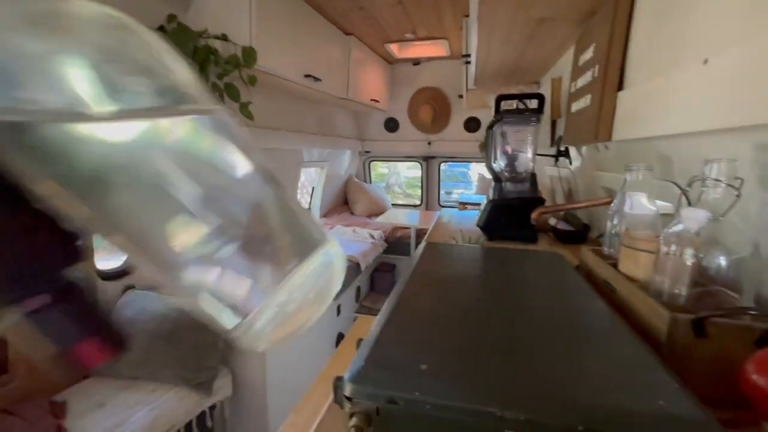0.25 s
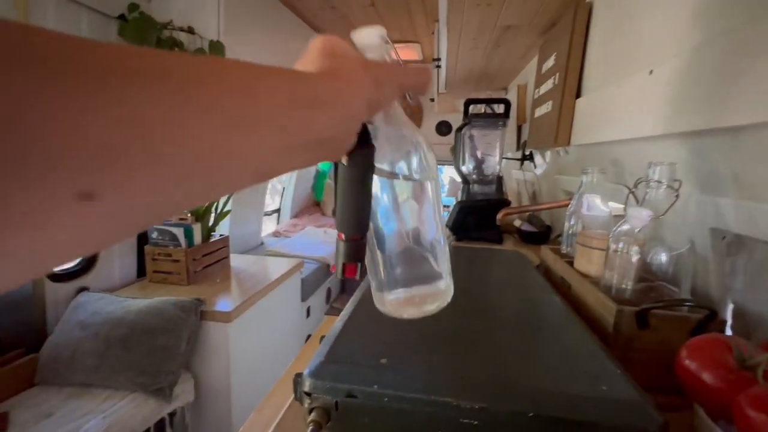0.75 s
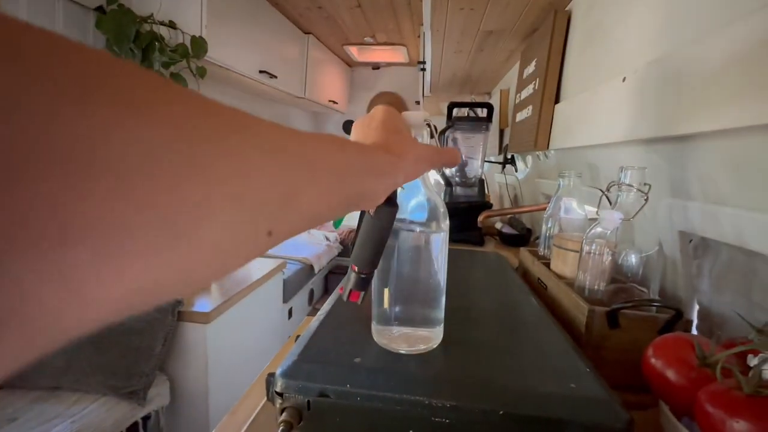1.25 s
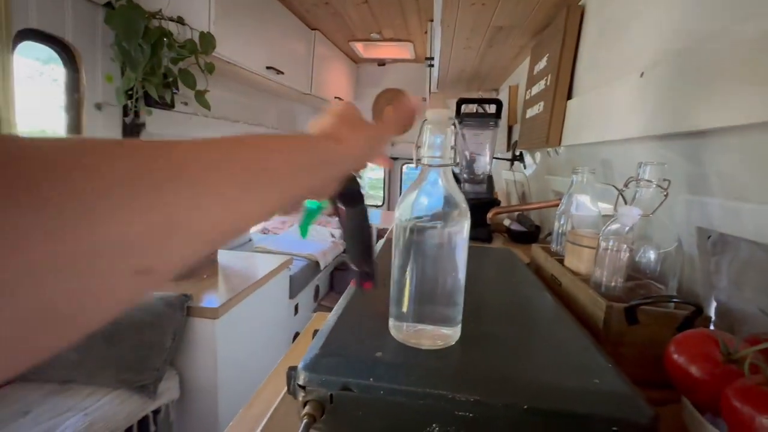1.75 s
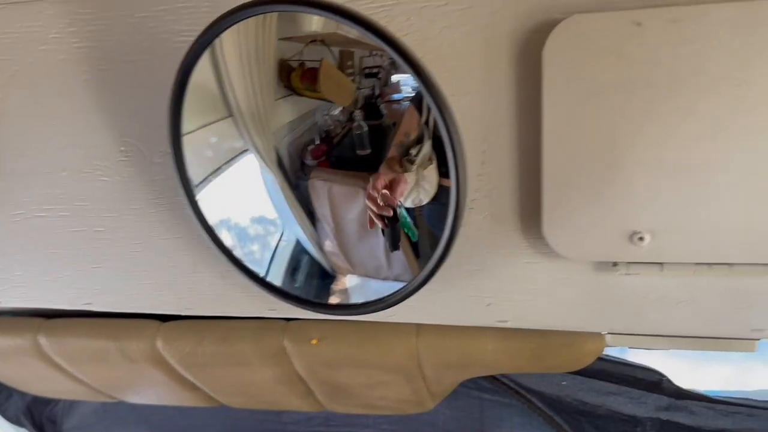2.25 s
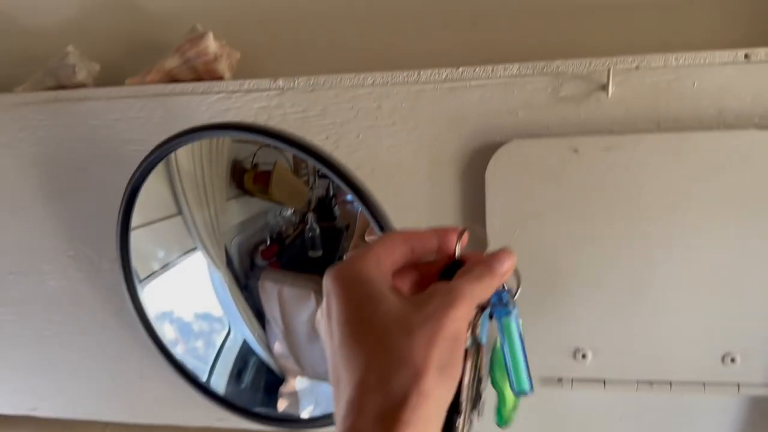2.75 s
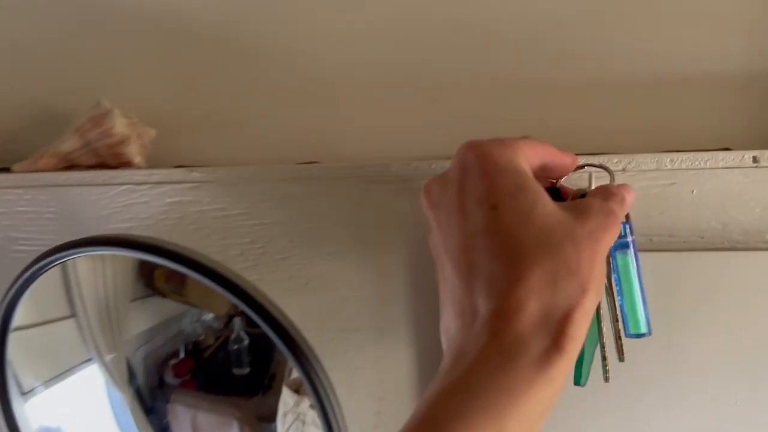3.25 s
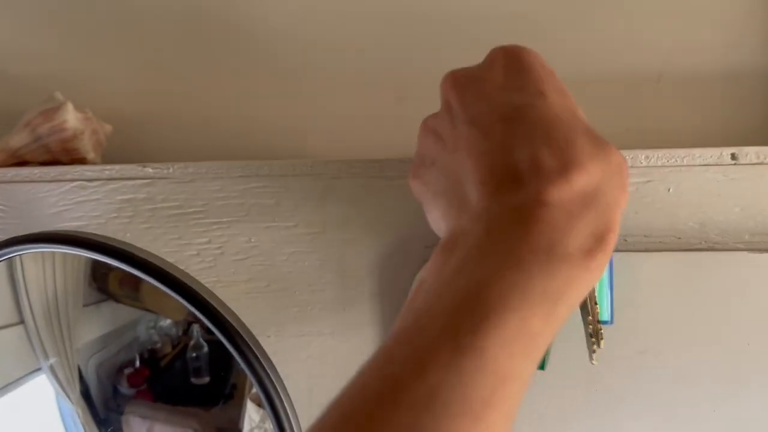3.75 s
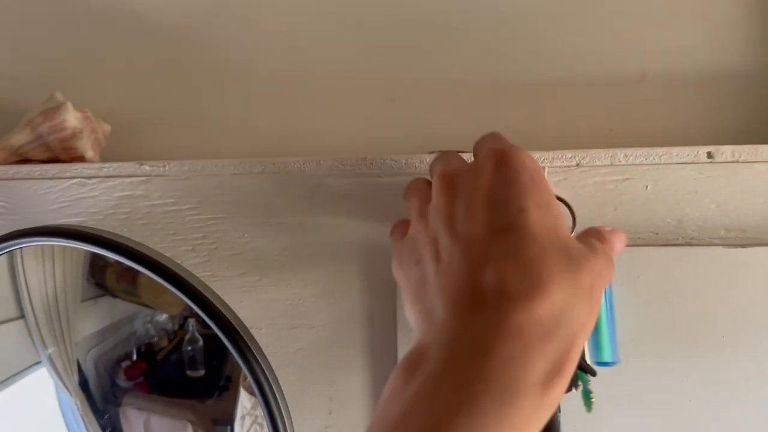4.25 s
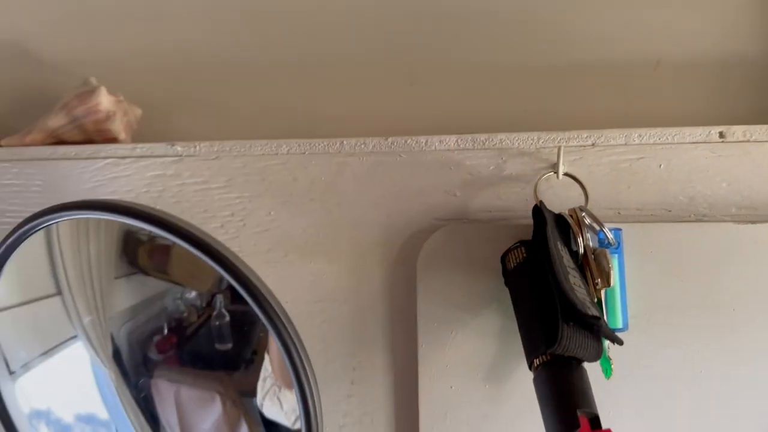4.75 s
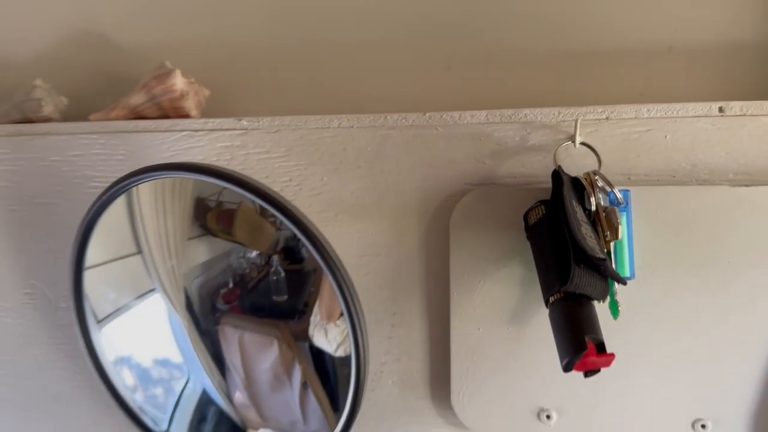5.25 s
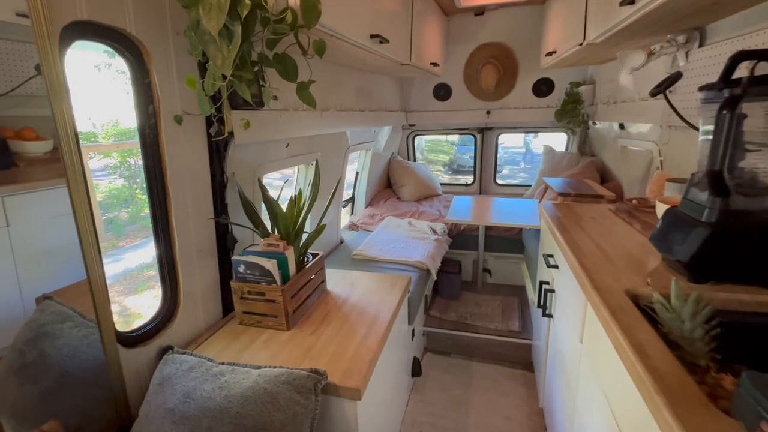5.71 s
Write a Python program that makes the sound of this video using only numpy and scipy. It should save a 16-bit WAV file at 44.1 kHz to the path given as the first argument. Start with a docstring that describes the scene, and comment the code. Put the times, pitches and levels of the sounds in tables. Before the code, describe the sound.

Cloth rustles as an arm reaches out, then a bottle base bumps a counter twice and rocks once, with a short woody ring. An appliance hums nearby until a cut to a quieter corner. There, bright keys jingle in a hand, grate on a hook, bump the wooden panel and clatter into place. Dry, close cabin sound with little reverberation, picked up in stereo near the hands.

```python
"""Inside a small camper van with a low hum, clothing rustles and a glass bottle is set down on a counter.
Then, in a quieter corner, a bunch of keys jingles in a hand, clacks and scrapes on a wall hook, and drops
onto it. Struck objects are noise bursts plus damped modes, with a short cabin tail behind glass and metal;
the wooden panel is modes alone. Cloth, sliding, scraping, whir, rumble and air are shaped noise, the hum
is two unsteady sines, and one faint click comes near the end."""
import sys
import numpy as np
from scipy import signal
from scipy.fft import rfft, irfft, next_fast_len
from scipy.io import wavfile
from scipy.ndimage import uniform_filter1d, map_coordinates

SR = 44100
rng = np.random.default_rng(int(sys.argv[2]) if len(sys.argv) > 2 else 0)


def output_pcm(signal):
    """Save a mono or channel-first signal as 16-bit PCM at the path in sys.argv[1].

    Samples are clipped to [-1, 1] before scaling.
    """
    pcm = np.clip(np.atleast_2d(signal).T, -1, 1) * 32767
    wavfile.write(sys.argv[1], SR, np.round(pcm).astype(np.int16))


N = 263718
TIME = np.arange(N) / SR  # seconds through the scene
AGE = np.arange(SR // 3) / SR  # seconds since a blow

# All dB in the tables are relative levels, before the fixed gains inside the functions.
# Keys touching each other. Each row: start in seconds, strength in dB, brightness in dB,
# the struck key's pitch in Hz, its t60 in seconds.
JINGLES = [(0.249, -44, -13, 8650, 0.019), (1.945, -58.5, 2.5, 13100, .03), (2.0637, -44, -10, 7300, .04),
           (2.147, -45, 3, 8160, 0.12), (2.3045, -39.5, -0.5, 14500, .05), (2.425, -62.5, -16, 4620, .04),
           (2.456, -70, -20, 4440, 0.024), (2.5791, -42.5, 0.5, 15680, 0.089),
           (2.796, -39.5, -4.5, 15500, 0.32), (2.871, -51, 5, 8070, 0.029),
           (2.9296, -55.5, -7.5, 10000, .025), (3.315, -51.5, -1, 14300, .06),
           (3.4083, -52, -4, 8100, 0.075), (3.6591, -62.5, -7, 15100, 0.043),
           (3.81, -61.5, -19, 5650, 0.023), (3.8694, -45.5, -9, 10700, .03),
           (3.9165, -35, -2.5, 10450, .06), (3.923, -31, 5.5, 13360, 0.066),
           (3.933, -39, 1.5, 15400, 0.097), (4.1222, -41, -7, 10400, .04), (4.156, -45.5, -9, 12900, .04),
           (4.186, -45.5, -13, 15400, .035)]
# Modes of the whole bunch. Each row: nominal pitch in Hz, level in dB.
KEY_MODES = [(5152, -11), (6150, -11), (7250, -7), (7950, -3), (8170, -5), (10280, -2), (10600, -6),
             (12950, -1), (13350, -4), (14250, -5), (15170, -6), (15680, -4)]
# Spectrum of a jingle. Each row: frequency in Hz, gain in dB.
JINGLE_COLOUR = [(200, -22), (1200, -7.5), (4000, -3), (8000, 0), (14000, 3.5), (16000, 5.5)]
JINGLE_T60_S, BUNCH_T60_S = 0.035, 0.082  # chatter of one touch; ring of the whole bunch
KEY_SPLIT_HZ = 180  # a key's close pair of modes
# Faint ticks while the bunch swings.
SWING_START_S, SWING_END_S, TICKS_PER_S = 2.15, 3.7, 5.5
TICK_DB, TICK_SPREAD_DB, TICK_BRIGHT_DB = -59.5, 3, -4.5

# Ring and fobs striking the hook. Each row: start in seconds, strength in dB, wall clack in dB, clink in dB,
# hook's ring in dB, chatter t60 in seconds, panel bump in dB, two pitches of the struck piece in Hz.
CLACKS = [(3.2689, -26, -6, -6, -12, 0.057, -30.5, 3580, 9150),
          (3.4736, -34.5, -6.5, -6.5, -20, 0.038, -36.5, 920, 8320),
          (3.878, -37.5, -1.5, 6, -18, 0.068, -33.5, 1060, 7070),
          (3.917, -42, -4, 1, -17.5, .085, -44, 1100, 14000),
          (4.0273, -25.5, -0.5, -18.5, -14, .042, -33, 1630, 850),
          (4.032, -18.5, -7.5, -8.5, -6, .06, -36, 4660, 3214),
          (4.1962, -27, -26, -4, -6, 0.053, -35, 423, 7200),
          (4.239, -24, -7.5, -9, -9.5, 0.077, -50, 4800, 5600),
          (4.256, -33.5, 0.5, -11, -11, 0.048, -55, 4200, 6600)]
# Modes of ring, hook and board. Each row: pitch in Hz, level in dB, t60 in seconds.
HOOK_MODES = [(596, -6.5, .1), (847, -6, .09), (1118, -8, .11), (1624, -15.5, 0.027), (2060, 3, .085),
              (2260, -2, .08), (2670, -6, .12), (3020, -4.5, .1), (3200, -5, 0.043), (3600, -8, .11),
              (4240, -7.5, .12), (4780, 0, .09), (5200, -5, .085), (6540, -9, .075)]
# Spectrum of a clack. Each row: frequency in Hz, gain in dB.
CLACK_COLOUR = [(100, -22), (200, 2.5), (380, 10), (620, 9), (1200, 11), (1800, 3), (2900, 0), (3700, -1),
                (4800, 0), (6000, 1.5), (8500, 7.5), (14000, 0.5)]
# Resonances of the key ring, heard in every clack and scrape: a plain list of pitches in Hz.
RING_HZ = [2350, 2940]
KNOCK_DB, SHIMMER_DB = -1.5, -2  # low knock; top treble relative to the clink

# The ring scraping along the hook. Each row: start in seconds, level in dB.
SCRAPES = [(3.229, -50), (3.421, -50), (3.613, -62), (3.733, -59), (4.138, -48)]
# Spectrum of the grating. Each row: frequency in Hz, level in dB per Hz.
GRATE_SPECTRUM = [(150, -22.5), (380, 0.5), (1100, 3.5), (1700, -12.5), (2700, -3), (4000, -21),
                  (8500, -23), (14000, -25)]
SCRAPE_ATTACK_S, SCRAPE_HOLD_S, SCRAPE_T60_S = 0.0037, 0.0061, 0.044

# Glass base on the counter. Each row: start in seconds, strength in dB, thud in dB, treble in dB,
# rocking t60 in seconds.
BOTTLE = [(1.045, -23, -8, -15, 0.074), (1.2063, -20.5, -12, -12, 0.07), (1.3518, -33, -7.5, -19.5, 0.18)]
# Modes of bottle and counter top. Each row: pitch in Hz, level in dB, t60 in seconds.
COUNTER_MODES = [(250, -3, .12), (317, 0, .36), (382, -9, .16), (474, -2, .19), (514, -3, .21),
                 (565, -7, .12), (791, 1.5, .17), (1040, -5, .16), (1322, -2, .14), (1771, -10, .13),
                 (2080, -5, .1), (2240, -10, .11), (2490, -7, .07), (2982, -7, .08)]
# Spectrum of the bottle's blow. Each row: frequency in Hz, gain in dB.
BOTTLE_COLOUR = [(100, -16), (180, 5), (270, 16), (520, 6.5), (1100, 1.5), (2600, -4.5), (5000, 2.5),
                 (9500, -2.5), (14500, -11)]

# Hand and pouch bumping the wall panel. Each row: start in seconds, strength in dB.
BUMPS = [(3.293, -35), (3.335, -40.5), (3.359, -38.5), (3.529, -38), (3.659, -44.5), (3.738, -45),
         (3.934, -36), (3.973, -41)]
# Modes of the wooden panel. Each row: nominal pitch in Hz, level in dB, t60 in seconds.
PANEL_MODES = [(93.6, -15, 0.21), (262, -2.5, 0.065), (289.5, -1.5, 0.13), (365.4, -5, 0.15),
               (458, -13.5, 0.027), (575, -11.5, 0.077), (830, -7.5, 0.048), (987, -10.5, 0.08)]
# The whole wall flexing. Each row: pitch in Hz, level in dB, t60 in seconds.
WALL_MODES = [(65, -5, 0.27), (100.6, -4, 0.35)]
WALL_DB = -7.5  # flexing wall relative to the panel
PANEL_DETUNE = .06  # share by which the pitch shifts with where the hand presses
BUMP_LAG_S = 0.00626  # the panel answers a clack this late

# Clothing moving with the arm. Each row: start in seconds, hold in seconds, level in dB.
REACHES = [(-.03, 0.078, -51.5), (.25, 0.0067, -52.5), (.583, 0.14, -50.5), (.792, 0.15, -50.5)]
# Spectrum of the clothing. Each row: frequency in Hz, level in dB per Hz.
CLOTH_SPECTRUM = [(120, -31), (200, 1.5), (380, -6.5), (448, -2), (836, -7), (1160, -3.5), (1840, -11.5),
                  (4120, -17.5), (5940, -19), (10300, -22.5), (11500, -34.5), (13300, -37), (16000, -35)]
# Cloth resonances: a plain list of pitches in Hz.
RUSTLE_HZ = [5170, 5860]
# Fingers and pouch sliding on the wall. Each row: start in seconds, hold in seconds, level in dB.
SLIDES = [(2.06, 0.37, -68.5), (2.97, 0.76, -67.5), (3.19, 0.1, -64.5), (3.86, 0.067, -57),
          (4.13, 0.13, -55.5)]
# Spectrum of the sliding. Each row: frequency in Hz, level in dB per Hz.
SLIDE_SPECTRUM = [(110, -38.5), (180, -0.5), (432, -2.5), (527, -4), (2440, -15), (2820, -14.5),
                  (7140, -25), (9210, -26.5), (10300, -68.5), (14000, -37)]
# The hand brushing over the cloth pouch. Each row: start in seconds, hold in seconds, level in dB.
BRUSHES = [(3.05, .17, -65.5), (4.29, 0.049, -55.5)]
# Spectrum of the brushing. Each row: frequency in Hz, level in dB per Hz.
BRUSH_SPECTRUM = [(200, -23), (450, 3), (900, 0), (1500, -2), (2500, -6), (3000, -17), (7000, -48),
                  (14000, -48)]
# One faint dry click. A single row: start in seconds, peak in dB.
CLICK = (5.5795, -42.5)

# The background at each listening spot. Each row: start in seconds, rumble in dB, air in dB, hum in dB,
# whir in dB.
SPOTS = [(0, -50, -88, -47, -55.5), (2.082, -56, -65.5, -62.5, -81), (5.58, -54.5, -70.5, -70, -67)]
# Partials of the hum. Each row: pitch in Hz, level in dB.
HUM = [(133.5, -4.5), (313, -20)]
# Spectrum of the whir by the counter. Each row: frequency in Hz, level in dB per Hz.
WHIR_SPECTRUM = [(100, -28), (170, -8.5), (290, 0), (400, -8), (520, -4.5), (800, -5.5), (1300, -5),
                 (1750, -19), (3000, -23), (6000, -27.5), (10000, -32.5), (15000, -62)]
# Spectrum of the low rumble. Each row: frequency in Hz, level in dB per Hz.
RUMBLE_SPECTRUM = [(15, -32.5), (28, -12.5), (38, -6), (50, -1), (65, -0.5), (85, -4.5), (110, -7.5),
                   (150, -7.5), (190, -18.5), (260, -41), (400, -58.5)]
# Spectrum of the air noise. Each row: frequency in Hz, level in dB per Hz.
AIR_SPECTRUM = [(100, -17), (170, -6.5), (440, -19), (889, -17.5), (959, -18.5), (1600, -27), (2090, -34),
                (2300, -28.5), (4920, -34), (8220, -40), (11600, -70), (14300, -37), (16000, -76)]

# Decay of the cabin. Each row: frequency in Hz, t60 in seconds.
CABIN_T60 = [(200, 0.68), (600, 0.26), (2000, 0.18), (8000, 0.16), (15000, 0.086)]
# Stereo image. Each row: frequency in Hz, left-right likeness (1 is identical).
ALIKE = [(30, 1), (100, 0.81), (330, 0.81), (600, 0.13), (1100, 0.047), (5000, 0.15), (14000, 0.27)]
# Colour of the microphone. Each row: frequency in Hz, gain in dB.
MICROPHONE = [(10000, 1.5), (10900, 8), (11500, -5), (12100, 4.5), (12800, -2), (15700, -2.5),
              (16500, -23.5)]
# Colour of the part common to both ports. Each row: frequency in Hz, gain in dB.
CANCEL = [(9800, -0.5), (10600, -13), (11300, -23), (12000, -12.5), (12900, 4)]
TOP_HZ = 16700  # upper band limit


def jingles():
    """The clear touches, and faint chance ticks while the bunch swings in the hand."""
    out = np.zeros((2, N))
    for s, *blow in JINGLES:
        add(out, s, touch(*blow))
    for slot_s in np.arange(SWING_START_S, SWING_END_S, 1 / TICKS_PER_S):
        late, size, choice = rng.random(3)
        key_hz = KEY_MODES[int(choice * len(KEY_MODES))][0]
        tick_db = TICK_DB + TICK_SPREAD_DB * (2 * size - 1)
        add(out, slot_s + late / TICKS_PER_S, touch(tick_db, TICK_BRIGHT_DB, key_hz, JINGLE_T60_S))
    return out * amp([[.2], [-.2]])  # dB: a touch to the left


def touch(db, bright_db, key_hz, key_t60):
    """Two keys tick together; the struck one rings along with the rest of the bunch."""
    pair = [(key_hz, 0, key_t60), (key_hz - KEY_SPLIT_HZ, -2, key_t60 / 2)]
    metal = amp(1) * bunch(BUNCH_T60_S) + amp(-3.5) * ring(pair, scatter_db=0)
    chatter = rattle(JINGLE_T60_S, rise=0.000532, spiky_db=4)
    tick = chatter + metal + amp(-4) * cabin()
    tint = [(4000, -bright_db), (8000, 1.5), (14000, bright_db)]
    return amp(db + 15) * coloured(tick, tinted(JINGLE_COLOUR, tint))


def bunch(t60):
    """The keys damp each other, and each grip detunes them a little."""
    modes = [(hz * (1 + 0.02 * rng.standard_normal()), db, t60) for hz, db in KEY_MODES]
    return ring(modes, scatter_db=7)


def clacks():
    """Key ring and fobs hit the hook: a resonant burst plus the ringing of hook and keys."""
    out = np.zeros((2, N))
    for s, db, clack_db, clink_db, hook_db, t60, _, *piece_hz in CLACKS:
        burst = rattle(t60, rise=0.0037, spiky_db=4) + amp(-12) * cabin()
        blow = resonant(burst, RING_HZ + piece_hz, width_hz=160, boost_db=10)
        metal = amp(hook_db) * ring(HOOK_MODES, scatter_db=2) + amp(-10) * bunch(t60=.08)
        tint = [(400, KNOCK_DB), (1200, clack_db), (1800, clack_db), (2300, 0), (4800, 0),
                (8000, clink_db), (14000, clink_db + SHIMMER_DB)]
        add(out, s, amp(db + 18.5) * coloured(blow + metal, tinted(CLACK_COLOUR, tint)))
    return out * amp([[.5], [-.5]])  # dB: a little to the left


def scrapes():
    """Feeling for the hook, the ring grates over it in short runs of tiny slips."""
    slips = rush(GRATE_SPECTRUM) * amp(3.4 * wobble(600))
    grate = unit(resonant(slips, RING_HZ, width_hz=230, boost_db=4.5))
    rows = [(s, SCRAPE_HOLD_S, db) for s, db in SCRAPES]
    return strokes(rows, SCRAPE_ATTACK_S, SCRAPE_T60_S) * grate


def bottle():
    """The glass base lands on one edge, then flat, and rocks once; the counter rings."""
    out = np.zeros((2, N))
    for s, db, thud_db, treble_db, t60 in BOTTLE:
        burst = rattle(t60, rise=0.0027, spiky_db=6.5) + cabin()
        tint = [(500, thud_db), (900, 0), (2800, 0), (5000, treble_db)]
        blow = coloured(burst, tinted(BOTTLE_COLOUR, tint))
        body = ring(COUNTER_MODES, scatter_db=2.5) * (1 - np.exp(-AGE / 0.0088))  # swells in
        add(out, s, amp(db + 27) * blow + amp(db + 24.5) * body)
    return out


def bumps():
    """Soft contacts, and the push behind each clack, sound the panel's low modes and flex the wall."""
    out = np.zeros((2, N))
    pushes = [(s + BUMP_LAG_S, bump_db) for s, *_, bump_db, _, _ in CLACKS]
    for s, db in BUMPS + pushes:
        shift = 1 + PANEL_DETUNE * rng.uniform(-1.16, 1)
        panel = ring([(hz * shift, level, t60) for hz, level, t60 in PANEL_MODES], scatter_db=3)
        flex = ring(WALL_MODES, scatter_db=2)
        soft_onset = 1 - np.exp(-AGE / 0.0032)
        add(out, s, amp(db + 22.5) * (panel + amp(WALL_DB) * flex) * soft_onset)
    return out


def clothing():
    """Clothing rustles as the arm reaches out: resonant noise with a crinkling level."""
    cloth = unit(resonant(rush(CLOTH_SPECTRUM), RUSTLE_HZ, width_hz=300, boost_db=3))
    crinkle = amp(1.7 * wobble(48.76) + 0.98 * wobble(400))
    return strokes(REACHES, attack_s=.045, release_s=.6) * crinkle * cloth


def sliding():
    """Fingers and pouch scrape over the wall in tiny slips: noise with a fluttering level."""
    slips = amp(2.5 * wobble(40) + wobble(350))
    return strokes(SLIDES, attack_s=0.028, release_s=0.53) * slips * rush(SLIDE_SPECTRUM)


def brushing():
    """The hand brushes over the cloth pouch as it lifts the bunch, and again as it lets go."""
    return strokes(BRUSHES, attack_s=0.038, release_s=.1) * amp(1.5 * wobble(120)) * rush(BRUSH_SPECTRUM)


def click():
    """A faint dry click, gone within a few milliseconds."""
    out = np.zeros((2, N))
    s, peak_db = CLICK
    snap = coloured(rattle(t60=0.004, rise=0.00026, spiky_db=1), [(4000, 0), (14000, -6)])
    add(out, s, amp(peak_db) * snap / np.abs(snap).max())
    return out


def background():
    """Low rumble and soft air noise; an appliance, strongest by the counter, whirs and hums unsteadily."""
    starts, *levels = np.transpose(SPOTS)
    spot = np.searchsorted(starts[1:], TIME)
    # each step between spots is smoothed over 800 samples
    rumble_db, air_db, hum_db, whir_db = uniform_filter1d(np.array(levels)[:, spot], size=800, axis=1)
    hum = np.zeros(N)
    for hz, db in HUM:
        phase = 2 * np.pi * hz * TIME + 0.52 * wobble(3.1)
        hum += amp(db + 0.58 * wobble(6.8)) * np.sin(phase)
    appliance = amp(hum_db) * np.sqrt(2) * hum + amp(whir_db) * rush(WHIR_SPECTRUM)
    return amp(rumble_db) * rush(RUMBLE_SPECTRUM) + amp(air_db) * rush(AIR_SPECTRUM) + appliance


def ring(modes, scatter_db):
    """Damped modes, struck with new strengths and reaching each microphone in their own phase."""
    hz, db, t60 = np.transpose(modes)[:, :, None]
    strength = db + scatter_db * rng.standard_normal(hz.shape)
    phase = rng.uniform(0, 2 * np.pi, hz.shape)
    apart = np.arccos(np.clip(along(ALIKE, hz), -1, 1)) / 2 * rng.choice([-1, 1], hz.shape)
    fade = amp(strength - 60 * AGE / t60)
    angle = 2 * np.pi * hz * AGE + phase
    return packet(np.array([(fade * np.sin(angle + side * apart)).sum(0) for side in (-1, 1)]))


def rattle(t60, rise, spiky_db):
    """Micro-bounces and their echoes off the nearest walls: a dense, spiky burst."""
    heights = np.repeat(rng.standard_normal(len(AGE)), 16)[:len(AGE)]  # a new level every 16 samples
    spikes = rng.standard_normal((2, len(AGE))) * amp(spiky_db * heights)
    decay = amp(-60 * AGE / max(t60, .004))
    return packet(stereo(spikes * decay * (1 - 0.78 * np.exp(-AGE / rise))))


def cabin():
    """A fresh short noise tail for the close cabin walls; the bass lasts longest."""
    hz, t, z = signal.stft(rng.standard_normal((2, len(AGE))), SR, nperseg=256)
    decay = amp(-60 * t / along(CABIN_T60, hz)[:, None])
    tail = signal.istft(z * decay, SR, nperseg=256)[1][:, :len(AGE)]
    return packet(stereo(tail * (1 - np.exp(-AGE / 0.0014))))


def rush(spectrum):
    """Stereo noise of rms 1 with the given spectrum."""
    noise = filtered(rng.standard_normal((2, N)), lambda hz: amp(along(spectrum, hz)))
    return unit(stereo(noise))


def strokes(rows, attack_s, release_s):
    """Gain of (s, hold, dB) strokes: each rises, holds and dies with a t60 of release_s."""
    gain = np.zeros(N)
    for s, hold, db in rows:
        rise = np.clip((TIME - s) / attack_s, 0, 1)
        held_until = s + attack_s + hold
        # the fall is exponential and starts when the hold ends
        fall = amp(-60 * np.maximum(TIME - held_until, 0) / release_s)
        gain += amp(db) * rise * fall
    return gain


def resonant(x, pitches, width_hz, boost_db):
    """x with broad causal resonances raised out of it."""
    def response(f):
        damping = 1j * f * width_hz
        return 1 + amp(boost_db) * sum(damping / (c * c - f * f + damping) for c in pitches)
    return filtered(x, response)


def tinted(colour, tint):
    """An object's spectrum with one blow's own (Hz, dB) tint on top."""
    return [(hz, db + along(tint, hz)) for hz, db in colour]


def coloured(x, points):
    """Minimum-phase filter with the gain of (Hz, dB) points, made by folding the cepstrum."""
    m = 2 * x.shape[-1]
    cepstrum = irfft(np.log(amp(along(points, np.fft.rfftfreq(m, 1 / SR)))), m)
    fold = 1 + np.sign(m // 2 - np.arange(m))
    fold[0] = 1
    return irfft(rfft(x, m) * np.exp(rfft(cepstrum * fold)), m)[..., :m // 2]


def filtered(x, response):
    """x times a response of frequency."""
    m = next_fast_len(x.shape[-1] + 8192)
    return irfft(rfft(x, m) * response(np.fft.rfftfreq(m, 1 / SR)), m)[..., :x.shape[-1]]


def stereo(pair):
    """Two unrelated signals become left and right: alike in the bass, apart in the treble."""
    def spread(hz):
        turn = np.arccos(np.clip(along(ALIKE, hz), -1, 1)) / 2
        return np.array([np.cos(turn), np.sin(turn)])
    mid, side = filtered(pair, spread)
    return np.array([mid + side, mid - side])


def wobble(rate):
    """A smooth random curve, rate knots a second."""
    return map_coordinates(rng.standard_normal(int(N * rate / SR) + 4), [TIME * rate])


def along(points, hz):
    """Read (Hz, value) points on a log frequency axis."""
    f, v = np.transpose(points)
    return np.interp(np.log(hz + 1), np.log(f + 1), v)


def amp(db):
    """Decibels to gain."""
    return 10 ** (np.asarray(db) / 20)


def unit(x):
    """Scale to rms 1."""
    return x / np.sqrt(np.mean(x ** 2) + 1e-20)


def packet(x):
    """Scale to a mean energy of 1 per channel."""
    return unit(x) / np.sqrt(x.shape[-1])


def add(out, s, x):
    """Mix x into out from time s."""
    part = out[:, max(round(s * SR), 0):][:, :x.shape[-1]]
    part += x[:, :part.shape[-1]]


def scene():
    """Everything heard in the van."""
    keys = jingles() + clacks() + scrapes()
    contacts = bottle() + bumps() + click()
    rubbing = clothing() + sliding() + brushing()
    return keys + contacts + rubbing + background()


def record(dry):
    """The two ports cancel each other in one treble band; a steep band limit follows."""
    left, right = coloured(dry, MICROPHONE)
    mid = coloured((left + right) / 2, CANCEL)
    side = (left - right) / 2
    return filtered(np.array([mid + side, mid - side]), lambda hz: hz < TOP_HZ)


dry = scene()
out = record(dry)
output_pcm(out)
```